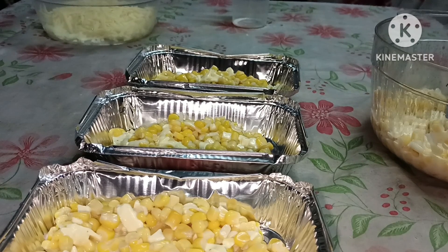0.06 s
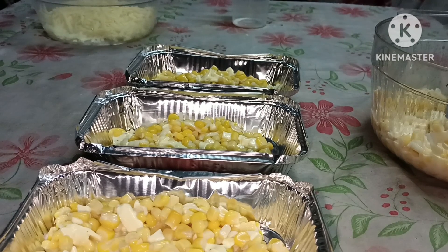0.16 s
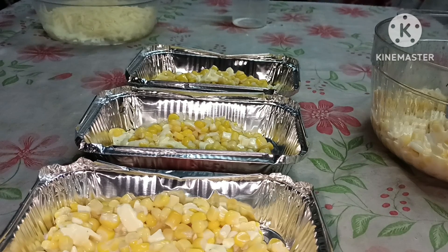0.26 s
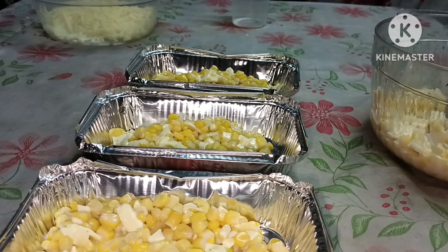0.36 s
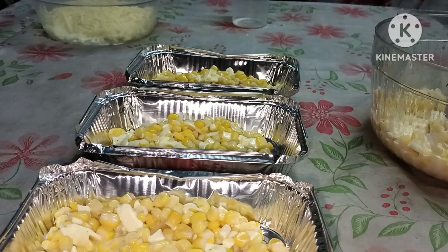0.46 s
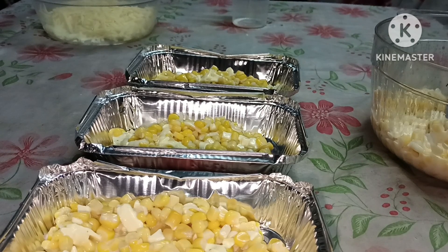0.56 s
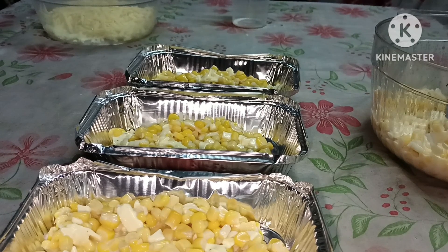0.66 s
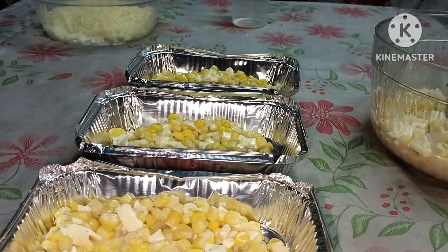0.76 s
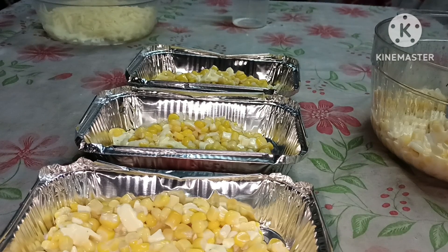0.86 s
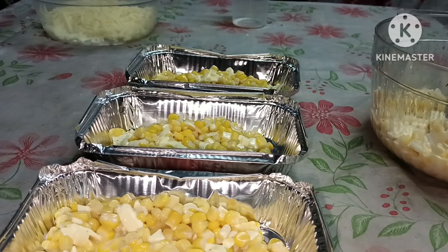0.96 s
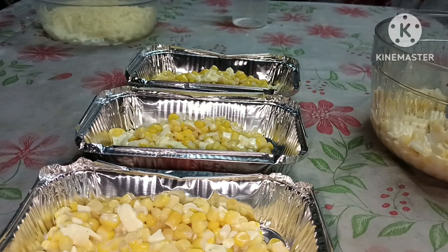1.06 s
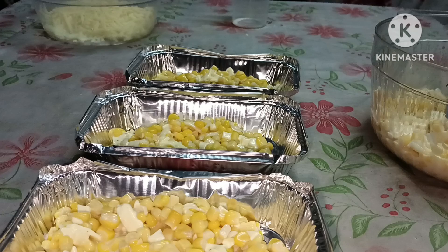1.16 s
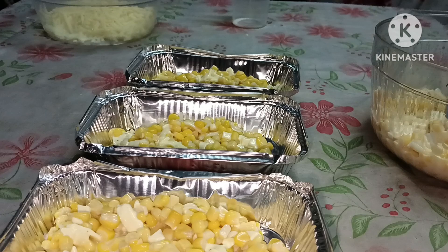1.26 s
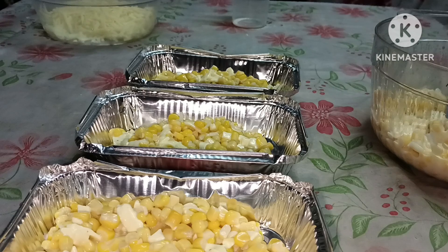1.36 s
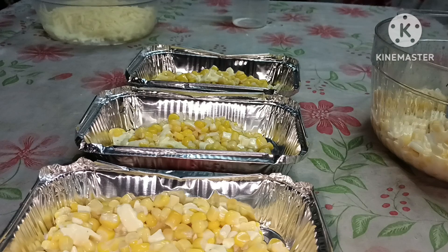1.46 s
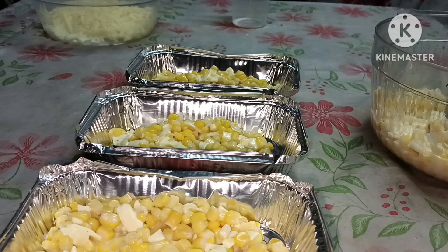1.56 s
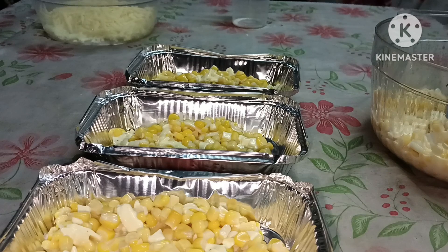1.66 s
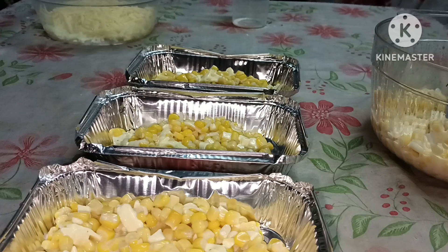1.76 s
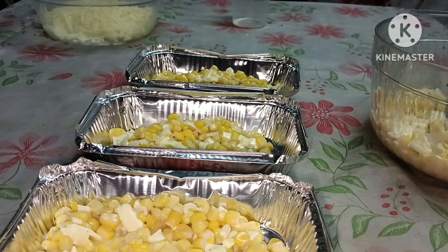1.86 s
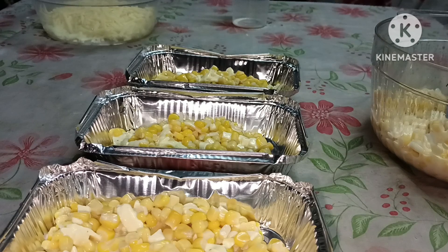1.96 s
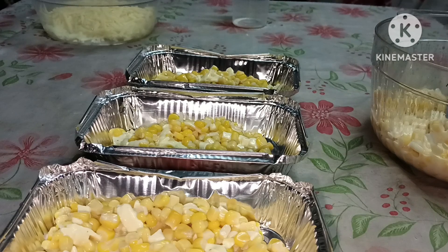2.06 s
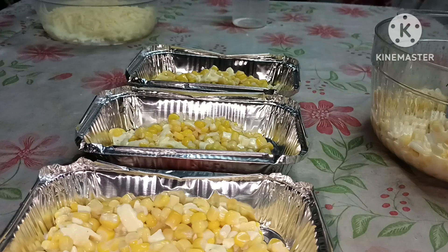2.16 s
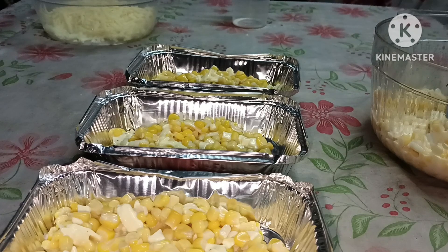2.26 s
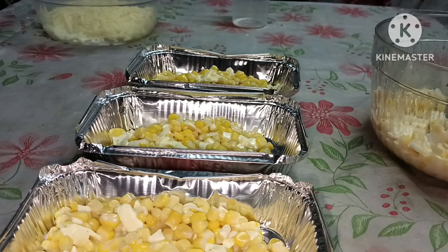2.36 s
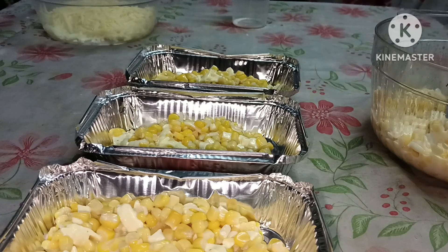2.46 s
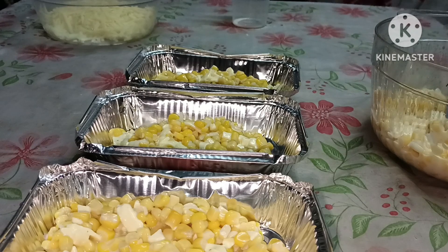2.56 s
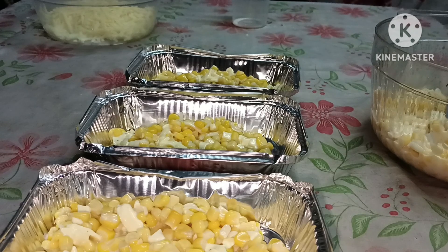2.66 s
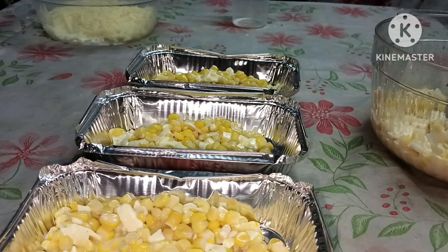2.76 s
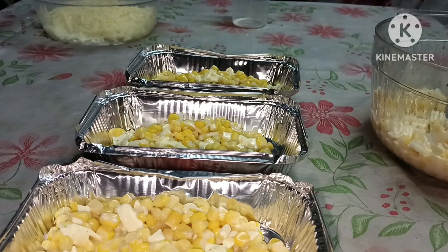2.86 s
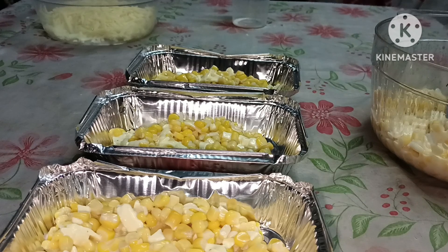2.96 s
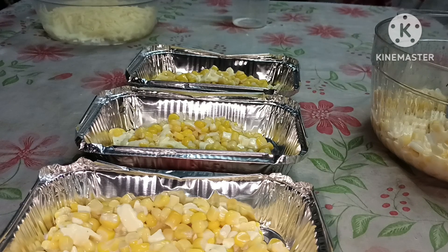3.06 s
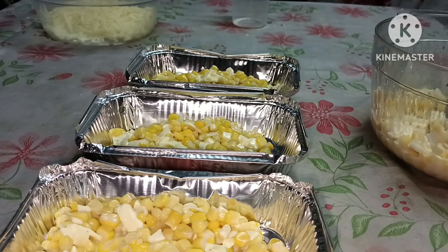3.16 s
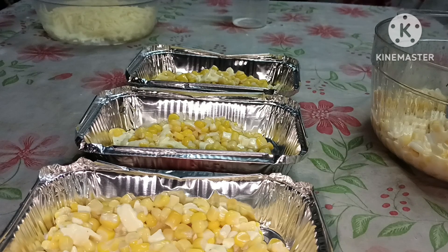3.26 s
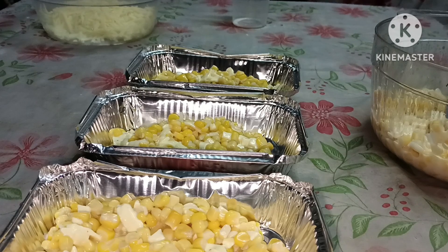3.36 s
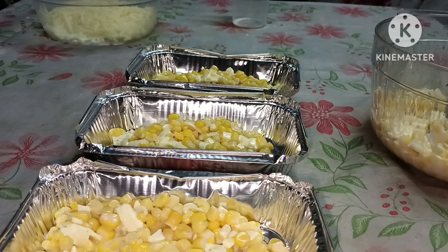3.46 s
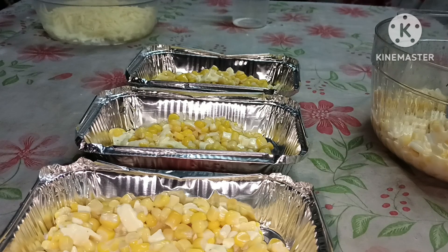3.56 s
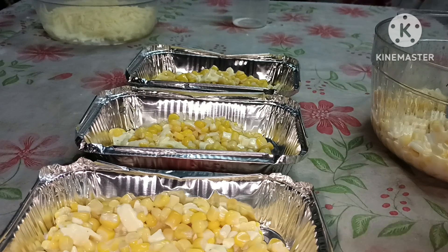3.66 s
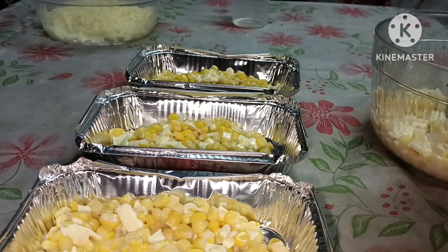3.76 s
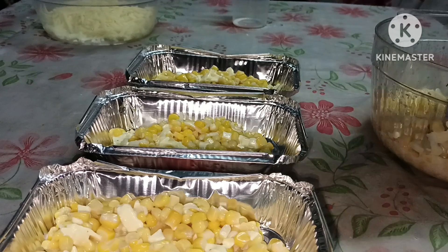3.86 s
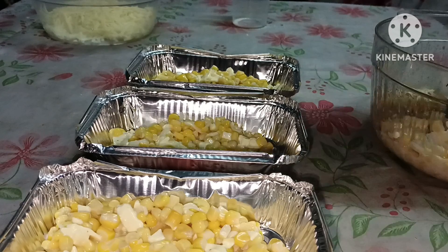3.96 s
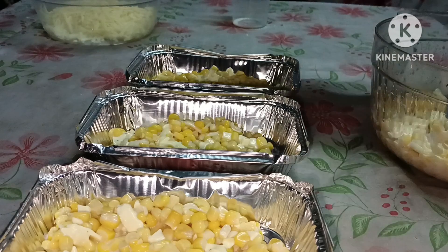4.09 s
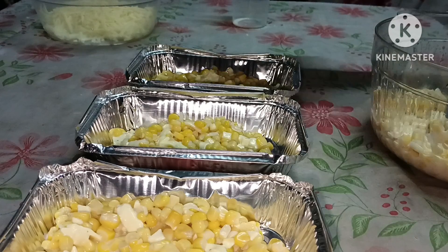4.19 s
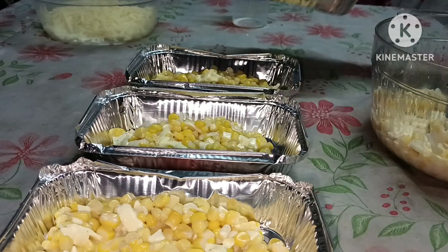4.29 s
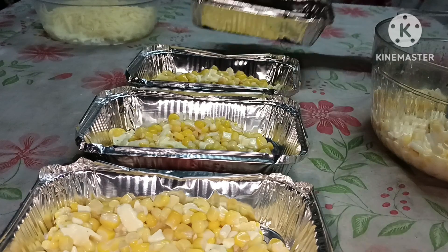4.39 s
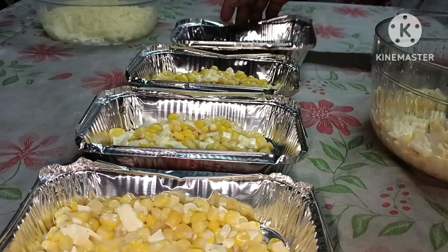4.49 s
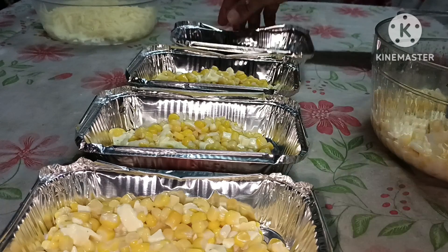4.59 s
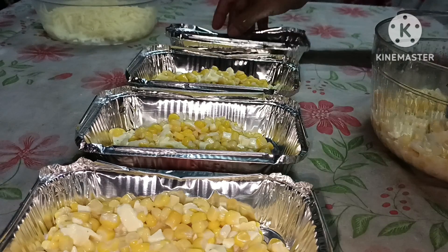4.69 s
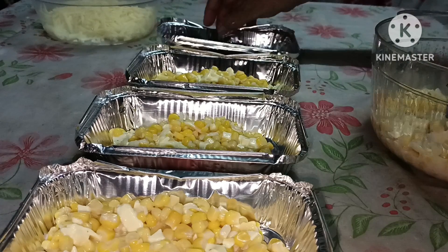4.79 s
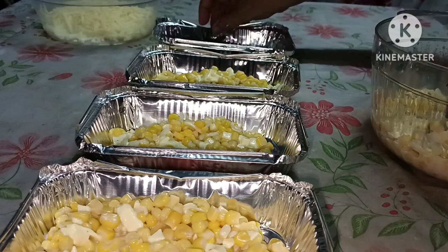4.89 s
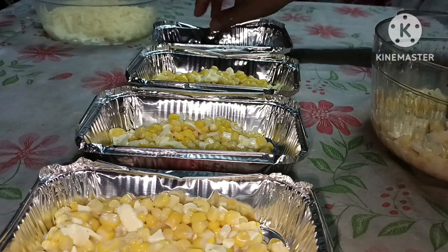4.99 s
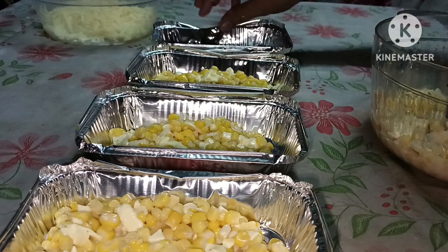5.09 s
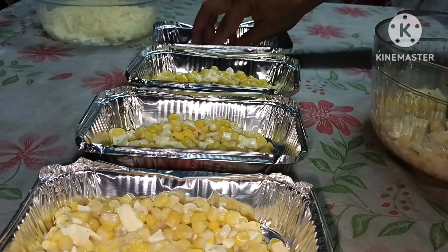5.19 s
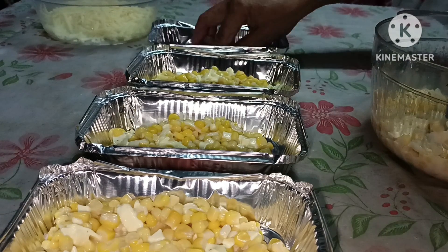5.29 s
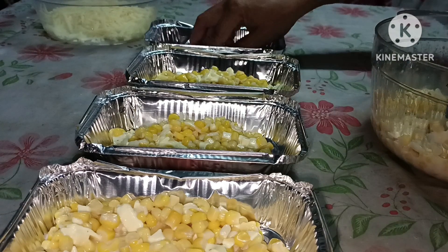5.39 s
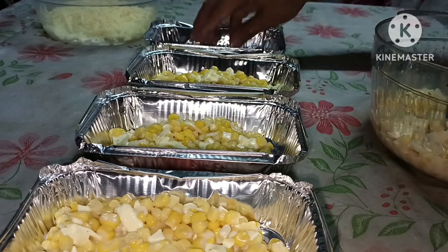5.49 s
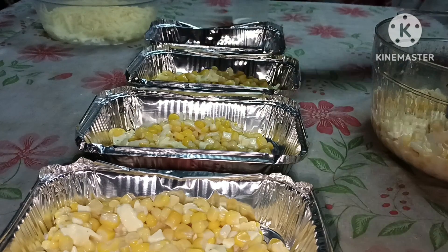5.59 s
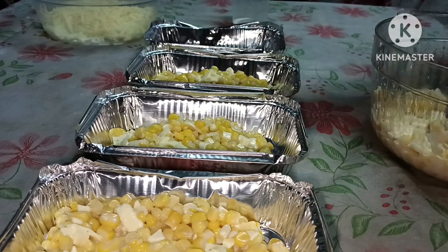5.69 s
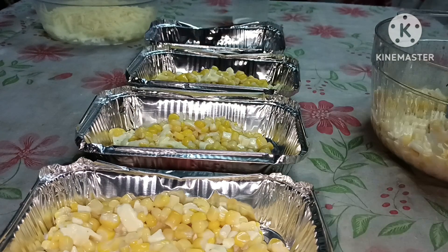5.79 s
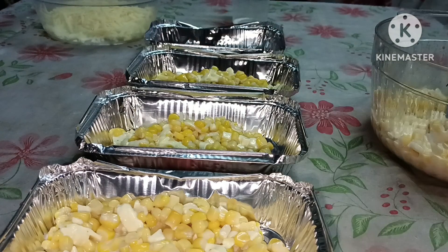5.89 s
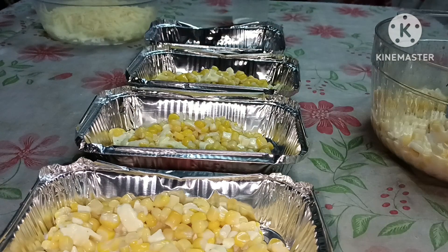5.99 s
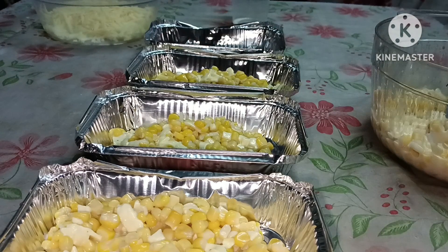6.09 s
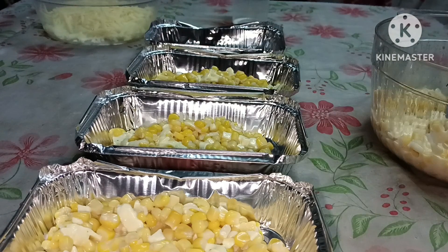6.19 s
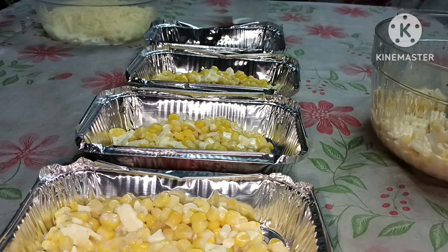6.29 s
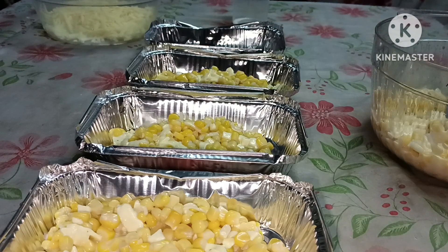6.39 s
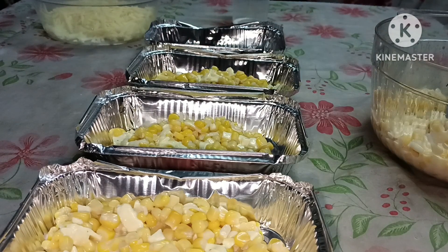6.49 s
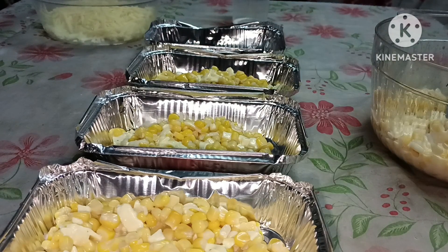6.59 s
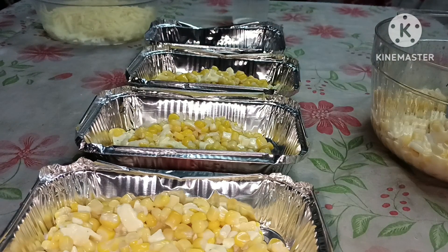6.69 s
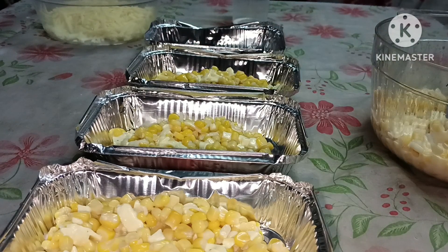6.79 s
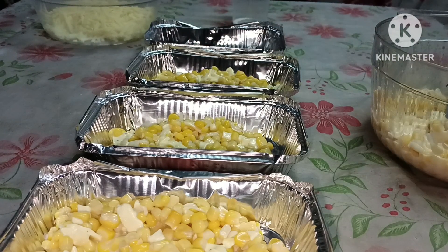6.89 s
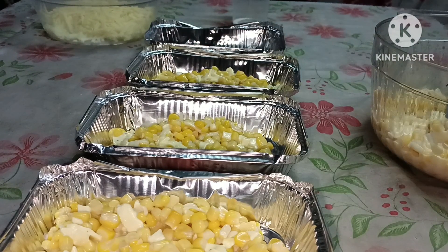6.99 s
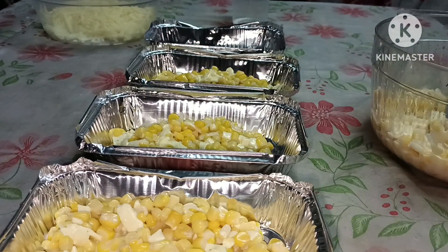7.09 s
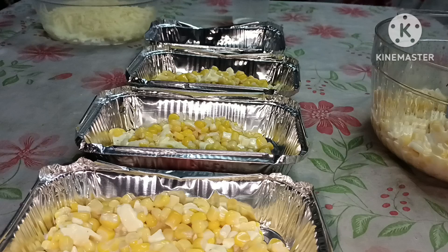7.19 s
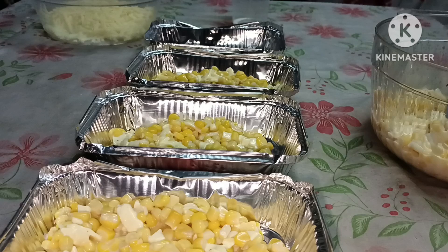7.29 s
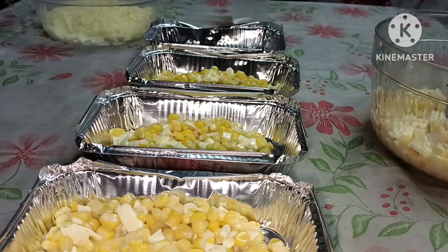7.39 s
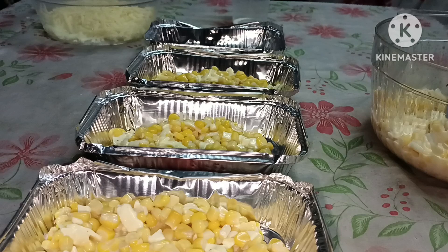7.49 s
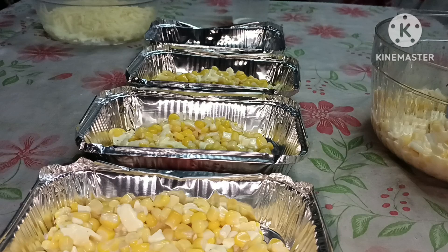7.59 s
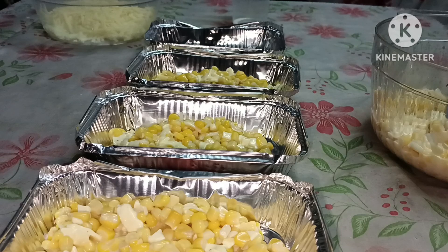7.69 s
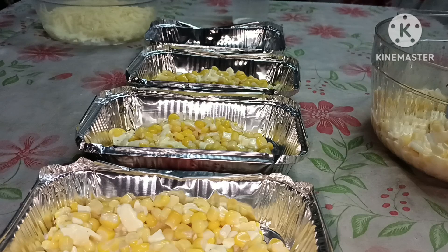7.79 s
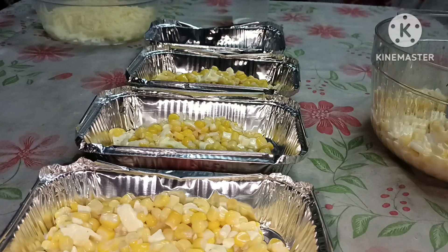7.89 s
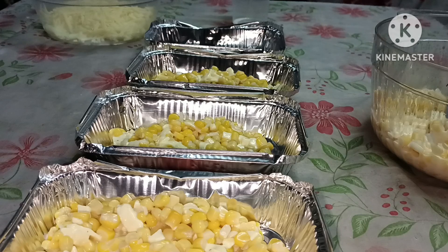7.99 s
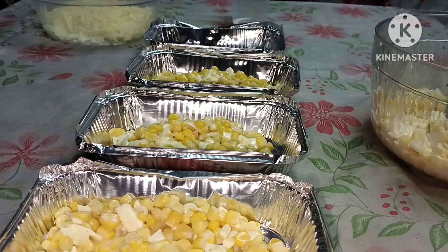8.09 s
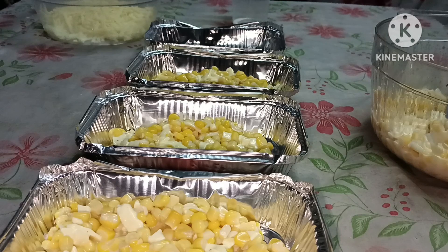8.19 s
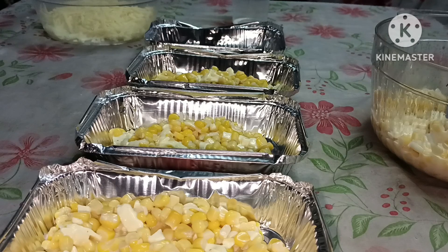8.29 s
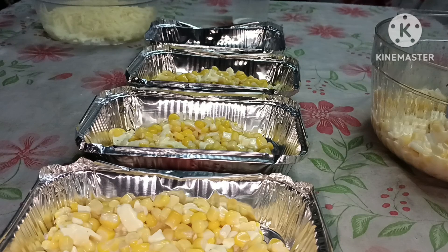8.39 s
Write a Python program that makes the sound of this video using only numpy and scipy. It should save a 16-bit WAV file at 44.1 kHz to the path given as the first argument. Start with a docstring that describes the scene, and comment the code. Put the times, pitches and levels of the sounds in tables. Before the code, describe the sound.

Close stereo microphone in a small quiet room. A few faint ticks of thin aluminium foil come first, then firmer clicks and a dense burst of bright crinkling and snapping as trays are handled and set on a covered table with dull little thuds. After a near pause, isolated snaps follow and a last crisp crinkle ends it. Low hum and soft hiss lie beneath.

```python
"""Creased foil trays snap and crinkle under handling: force pulses drive a crowd of short sheet modes.
Each snap adds a direct crack and a panel ring; contacts with a cloth-covered table excite its modes as thuds.
A small room adds decaying echoes. Two microphone ports differ in level, delay and treble.
Below lie mains hum (wandering sines), rumble and hiss (banded noise);
for about a second a faint, throbbing high squeal (a rough sine) comes from far off."""
import sys
import numpy as np
from scipy import signal
from scipy.io import wavfile
from scipy.ndimage import map_coordinates

SR = 44100
rng = np.random.default_rng(int(sys.argv[2]) if len(sys.argv) > 2 else 0)


def generate_wav(signal):
    """Clip the signal to [-1, 1] and save it as 16-bit WAV at the path in sys.argv[1]."""
    frames = np.transpose(np.atleast_2d(signal))
    scaled = np.clip(frames, -1, 1) * 32767
    pcm = np.round(scaled).astype(np.int16)
    wavfile.write(sys.argv[1], SR, pcm)


N = 372644

# snaps of the foil: [t/s, relative level/dB, body re level/dB, treble re level/dB, panel ring f/Hz]
SNAPS = [(0.049, -42.5, -16, 2.5, 930), (0.192, -36.5, -4.5, -4.5, 1190), (0.273, -31.5, -24, -17, 840),
         (0.328, -40.5, 6.5, -9, 1550), (0.464, -29, -25, -21, 735), (0.651, -27.5, -17, -9, 715),
         (0.728, -35.5, -17, -17, 1010), (0.832, -39, -13, -4, 820), (0.867, -32, -14, -0.5, 790),
         (0.93, -35.5, -3.5, -10, 670), (1.003, -45, -8, -2, 900), (1.147, -37, -19, -11, 850),
         (1.631, -24.5, -6, -27, 1804), (1.643, -15, -19, -20.5, 1060), (1.8, -32.5, -12.5, -14, 670),
         (1.877, -24, -26, -14.5, 690), (2.012, -35, -8, -20, 773), (2.063, -13.5, -11.5, -4, 1420),
         (2.496, -47.5, -4, 6, 710), (2.81, -28, -8, -4, 1740), (2.9, -32, -20, -16, 1180),
         (2.949, -35.5, -20, 8, 760), (2.962, -37.5, -21, 7.5, 960), (2.996, -37, -10, -23, 975),
         (3.018, -31, -11, -7, 1080), (3.029, -33, -8.5, 0, 990), (3.036, -30, -10, -2, 990),
         (3.047, -10.5, -26, -8, 1680), (3.064, -17, -16, -0.5, 1710), (3.087, -15, -16.5, -8, 970),
         (3.109, -27.5, -5.5, 2, 1030), (3.31, -27.5, -16, -2, 1010), (3.32, -36, -38, 3.5, 1000),
         (3.332, -16, -17, -5, 1640), (3.357, -22, -17.5, 3, 1420), (3.384, -20.5, -4, -2.5, 1590),
         (3.528, -28.5, -27.5, 5.5, 1540), (3.545, 3, -19, -8.5, 1385), (3.724, -14.5, -19.5, -18.5, 1635),
         (3.76, -31.5, 1.5, 8.5, 1040), (3.819, -2, -14.5, -7, 1324), (3.857, -14, -21, 1, 970),
         (4.051, -44, -13, 1, 1510), (4.13, -21, -7, -5, 1310), (4.28, -18, 5, -5.5, 1232),
         (4.66, -6.5, -15.5, -9, 1080), (4.664, -8.5, -18, -12, 1060), (4.685, 0, -19.5, -9, 758),
         (4.816, -32, -27, 8, 1270), (4.892, -28.5, -23, -3, 1170), (4.938, -9, -17, -41.5, 915),
         (4.945, -6.5, -24.5, -47.5, 1000), (5.016, -22.5, -10.5, -9.5, 1040), (5.044, -10, -23.5, -1, 960),
         (5.064, -4, -13, -6, 1400), (5.407, -8, -9, -4.5, 1065), (5.444, -10.5, -9.5, -23, 1280),
         (6.27, -27.5, -14, -17, 955), (6.287, -14.5, -14, -15.5, 890), (6.539, -32.5, -18, 5.5, 1600),
         (7.019, -37.5, -36, 11, 807), (7.025, -42, -35, 4.5, 803), (7.253, -30.5, -48, 8, 730),
         (7.276, -34, -35, 2, 789), (7.348, -0.5, -25.5, -7.5, 1947), (7.619, -27, -13, -58, 1074),
         (7.659, -14, -17.5, -44, 785), (7.685, -25, -0.5, -64, 1294), (7.823, -27, -14, -17.5, 965),
         (7.837, -6, -30, -11, 966), (8.133, -44, -18, -8, 1270), (8.142, -34, -17, -4, 1500),
         (8.151, -39, -21, -5, 1700), (8.241, -8, -24, 4, 1250), (8.252, -12.5, -2.5, -17, 1220),
         (8.336, -10.5, -12.5, -7.5, 990), (8.359, -20, -15, -2, 1000), (8.376, -30, -12, -3, 1010)]
BODY_HZ, MIDDLE_HZ, TREBLE_HZ = 960, 2845, 9300  # centres of the three force bands


def from_db(db):
    """Amplitude ratio of a level: 20 dB per factor of ten."""
    return 10 ** (np.asarray(db) / 20)


def rms_one(x):
    """Normalization of the mean square to 1."""
    return x / np.sqrt(np.mean(x ** 2) + 1e-20)


def in_time(rows):
    """Linear interpolation of each column of a time table, sample by sample."""
    times_s, *columns = np.transpose(rows)
    return [np.interp(np.arange(N) / SR, times_s, column) for column in columns]


def at_hz(points, hz):
    """Linear interpolation of a frequency table on a logarithmic frequency axis."""
    table_hz, values = np.array(points)[:, 0], np.array(points)[:, 1]
    return np.interp(np.log(hz), np.log(table_hz), values)


def drift(rate_hz):
    """Slow random modulation of rms 1: white noise through a double-pole low-pass."""
    # computed at every 40th sample, after a run-in of 2000 values
    pole = np.exp(-80 * np.pi * rate_hz / SR)
    white = rng.standard_normal(N // 40 + 2002)
    slow = signal.lfilter([1], [1, -2 * pole, pole * pole], white)[2000:]
    return np.interp(np.arange(N) / 40, np.arange(len(slow)), rms_one(slow))


def bandpass(edges_hz, x):
    """Band limitation by a Butterworth filter."""
    return signal.sosfilt(signal.butter(2, edges_hz, "band", fs=SR, output="sos"), x)


def ring(excitation, hz, t60_s):
    """Damped resonance: a unit click starts a decaying sine of initial height 1."""
    radius = from_db(-60 / (t60_s * SR))
    angle = 2 * np.pi * hz / SR
    poles = [1, -2 * radius * np.cos(angle), radius * radius]
    return signal.lfilter([0, np.sin(angle)], poles, excitation + 1e-18)


def snap_force(crack, rattle):
    """Impulsive excitation in three bands: a sharp crack with a weaker, slower-dying rattle."""
    band_db = [5, -10, 2]  # weights of body, middle and treble: [level/dB]
    crack_t60_s, crack_rise_s = 0.0052, 0.00061
    rattle_t60_s, rattle_db = 0.065, -19  # level before the weight "rattle"
    force = np.zeros((3, N))
    t = np.arange(int(rattle_t60_s * SR)) / SR
    shape = crack * from_db(-60 * t / crack_t60_s)
    shape = shape + rattle * from_db(rattle_db - 60 * t / rattle_t60_s)
    onset = 1 - np.exp(-t / crack_rise_s)
    for s, db, body_db, treble_db, _ in SNAPS:
        at = round(s * SR)
        levels = from_db(db + np.add(band_db, [body_db, 0, treble_db]))
        force[:, at:at + len(t)] += (onset * levels[:, None] * shape)[:, :N - at]
    return force


def crinkle_force(spread_db, per_s):
    """Random pulse process: many tiny uneven buckles, swelling and dying with each finger stroke."""
    # strokes: [peak t/s, rise t/s, fall t/s, relative peak level/dB, body re peak/dB, treble re peak/dB]
    strokes = [(0.282, 0.09, 0.18, -57, -18, 4.5), (1.21, 0.065, 0.098, -70, 7, 1),
               (1.585, 0.086, 0.17, -71, 3, 13), (1.78, 0.14, 0.072, -71, 5, 12),
               (2.068, 0.011, .12, -77, -9, -6), (3.06, 0.09, 0.058, -49, 0, -25),
               (3.369, 0.084, .2, -38.5, -5, -0.5), (3.448, 0.063, 0.17, -36.5, -4.5, 6),
               (3.55, 0.05, 0.1, -27, 0, 1), (3.679, 0.056, 0.023, -44, -11, 1.5),
               (3.734, 0.043, 0.11, -52, 8, 5), (3.828, 0.012, .12, -36, -1.5, -17),
               (3.908, 0.17, 0.16, -38, 10.5, -3.5), (4.07, 0.62, 0.068, -51.5, 2, 4),
               (4.285, 0.03, 0.071, -49.5, 2, -25), (4.491, 0.065, 0.19, -45.5, -15, 1.5),
               (4.667, 0.02, .26, -29.5, -6, -8), (5.082, 0.15, 0.15, -33.5, -16, -1.5),
               (5.411, 0.014, 0.11, -21, -7.5, -9), (5.47, 0.081, 0.19, -44.5, -27, -3.5),
               (6.33, .05, .3, -68, -17, 8), (6.52, 0.088, 0.24, -53.5, -39, 4.5),
               (7.354, 0.028, 0.16, -42, -11, 5.5), (7.839, 0.065, 0.17, -55, -9, 7),
               (7.92, 0.1, 0.11, -61.5, -15, 4.5), (8.14, 0.19, 0.39, -44, 2, 3),
               (8.245, 0.095, 0.14, -29.5, -2, 6.5), (8.347, 0.066, 0.13, -36, 4.5, -12)]
    swell_db = 30  # rise, and equal fall, of a stroke
    force = np.zeros((3, N))
    for s, rise_s, fall_s, db, body_db, treble_db in strokes:
        start, stop = max(round((s - rise_s) * SR), 0), min(round((s + fall_s) * SR), N)
        n = np.arange(start, stop)
        course_db = np.interp(n / SR, [s - rise_s, s, s + fall_s], [-swell_db, 0, -swell_db])
        force[:, n] += from_db(db + course_db + np.array([[body_db], [0], [treble_db]]))
    sizes = from_db(spread_db * np.minimum(rng.exponential(1, N), 2.6))
    buckles = (rng.random(N) < per_s / SR) * sizes
    # each buckle dies within a few milliseconds, over a steady floor
    return force * rms_one(signal.lfilter([1], [1, -.97], buckles) + .5)


def foil(force, cycles, bend_db, apart_db):
    """Modal superposition: a dense crowd of short sheet modes; bending sways each, unlike at the ports."""
    colour = [(480, -4), (750, -2.5), (1100, 9), (1500, 5), (2100, 10), (3000, 3), (4200, 2), (6000, -8),
              (7300, -15.5), (8000, -6), (9800, 0.5), (12500, -13.5), (15200, -1), (15900, -21.5)]  # radiated spectrum of the sheet: [f/Hz, relative level per Hz/dB]
    low_hz = 590  # the small sheet radiates no bass
    n, out = np.arange(float(N)), np.zeros((2, N))
    centres = np.log([BODY_HZ, MIDDLE_HZ, TREBLE_HZ])
    white, log_force = rng.standard_normal(N), np.log(force + 1e-9)
    bends = np.arange(0, N + 1500, 1500)  # samples at which the sway takes a new value
    modes_hz = np.geomspace(500, 15800, 60) * rng.uniform(0.8295, 1.115, 60)
    for k, hz in enumerate(modes_hz):
        # the force at this mode lies between those of the neighbouring bands
        place = np.interp(np.log(hz), centres, [0, 1, 2])
        below = min(int(place), 1)
        share = place - below
        strength = np.exp((1 - share) * log_force[below] + share * log_force[below + 1])
        colour_db = at_hz(colour, hz) - at_hz(colour, MIDDLE_HZ)
        # higher modes stand for wider slices of the spectrum and ring shorter
        ringing = ring(strength * np.roll(white, 997 * k), hz, cycles / hz)
        mode = from_db(colour_db) * hz / SR * ringing
        shared, apart = rng.standard_normal((2, len(bends)))
        for port, sign in enumerate([1, -1]):
            sway_db = bend_db * shared + sign * apart_db * apart
            out[port] += mode * np.interp(n, bends, from_db(sway_db))
    return signal.sosfilt(signal.butter(4, low_hz, "high", fs=SR, output="sos"), out)


def cracks():
    """Direct radiation: the first instant of each snap is a noise burst, too short to ring."""
    bands_hz = [(600, 1500), (1500, 2300), (7600, 19000)]  # body, middle and treble: [low f/Hz, high f/Hz]
    bursts = snap_force(crack=1, rattle=0) * rng.standard_normal(N) + 1e-18
    return from_db(-8) * sum(bandpass(band, burst) for band, burst in zip(bands_hz, bursts))


def panel_rings():
    """Free vibration: the flat panel next to each snap rings briefly on a close pair of modes."""
    ring_db, t60_s = -3.2, 0.067
    out, t = np.zeros(N), np.arange(int(t60_s * SR)) / SR
    splits = rng.uniform(1.04, 1.12, len(SNAPS))  # frequency ratio of each pair
    for (s, db, body_db, _, hz), split in zip(SNAPS, splits):
        pair = np.sin(2 * np.pi * hz * t) + 0.42 * np.sin(2 * np.pi * hz * split * t)
        decay = from_db(db + body_db + ring_db - 60 * t / t60_s)
        at = round(s * SR)
        out[at:at + len(t)] += (decay * pair)[:N - at]
    return out


def table_thuds():
    """Impulse response of the table top: each contact sets its damped low modes ringing."""
    contacts = [(0.925, -44), (2.012, -34), (2.813, -35), (3.546, -25), (3.82, -19.5), (3.853, -17),
                (3.897, -23.5), (4.278, -24.5), (4.66, -23), (4.684, -41), (5.065, -38), (5.405, -30),
                (5.444, -29), (6.27, -25.5), (6.29, -45), (6.487, -34), (8.23, -32.5)]  # contacts that shake the table: [t/s, relative level/dB]
    modes = [(130, 7.5, 0.017), (177, 9, 0.065), (240, 1.5, 0.053), (291.3, 3, 0.095), (385, -11.5, 0.13),
             (474.4, -8.5, 0.013)]  # modes of the table top: [f/Hz, relative level/dB, t60/s]
    at, out = [round(s * SR) for s, _ in contacts], np.zeros(N)
    contact_db = np.array(contacts)[:, 1]
    scatter_db = rng.normal(0, 4.18, (len(at), len(modes)))
    for k, (hz, mode_db, t60_s) in enumerate(modes):
        clicks = np.zeros(N)
        # neighbouring modes start with opposite signs
        clicks[at] = from_db(contact_db + mode_db - 10.0 + scatter_db[:, k]) * (-1) ** k
        out += ring(clicks, hz, t60_s)
    return out


def ports(x):
    """Interport level and time difference: the sound is louder and earlier at the nearer port."""
    lean = [(0, 3.5), (3.4, 3), (4.12, 8.5), (4.4, 2.5), (5.5, 2), (6.2, 5), (8.45, 4)]  # where the hands work: [t/s, left-right level difference/dB]
    lag_per_db = 4  # samples by which the right port hears later, per dB of lean
    # the left port faces the left side: its top treble grows with the lean
    top_hz, top_db, top_db_per_db = 11900, -4, 1.03
    lean_db, = in_time(lean)
    lag, n = np.clip(lag_per_db * lean_db, -17, 17), np.arange(N)
    low = signal.sosfilt(signal.butter(2, top_hz, "low", fs=SR, output="sos"), x)
    top = signal.sosfilt(signal.butter(2, top_hz, "high", fs=SR, output="sos"), x)
    # the minus sign keeps the two parts in phase where they cross
    left, right = low - top * from_db(top_db + top_db_per_db * lean_db * [[1], [0]])
    delayed = map_coordinates(right, [n - lag], order=3)
    return np.array([from_db(lean_db / 2) * left, from_db(-lean_db / 2) * delayed])


def room(near):
    """Reverberation: dense echoes, other ones at each port, as octave bands of noise with own decays."""
    decay = [(300, 0.41), (1500, 0.21), (4000, 0.29), (12000, .16)]  # reverberation time of the room: [f/Hz, t60/s]
    first_echo_s = 0.004
    t, tail = np.arange(SR // 2) / SR, 0
    for hz in 125 * 2. ** np.arange(8):
        edges = [hz / np.sqrt(2), min(hz * np.sqrt(2), .45 * SR)]
        band = bandpass(edges, rng.standard_normal((2, len(t))))
        tail = tail + band * from_db(-60 * t / at_hz(decay, hz))
    tail = tail * (1 - np.exp(-(t / first_echo_s) ** 2))  # echoes set in gradually
    return signal.fftconvolve(near, rms_one(tail) / np.sqrt(len(t)), axes=1)[:, :N]


def wavering_tone(hz, db, waver_hz, flicker_db):
    """Frequency and amplitude modulation: a sine whose pitch and level wander."""
    phase = 2 * np.pi * np.cumsum(hz + waver_hz * drift(8)) / SR
    return np.sqrt(2) * from_db(db + flicker_db * drift(4.6)) * np.sin(phase)


def squeal():
    """Modulated tone: a faint, rough whistle sags in pitch, settles and throbs, unlike in the two ports."""
    start_s, end_s, fade_s = 1.27, 2.55, .06
    start_hz, sag_hz, sag_s = 8730, 260, .3
    mean_db, pulse_db, pulse_s = -73, 3, .16  # throb about the mean level, and its period
    t = np.arange(N) / SR - start_s
    hz = start_hz - sag_hz * (1 - np.exp(-np.maximum(t, 0) / sag_s))
    sounding = np.clip(np.minimum(t, end_s - start_s - t) / fade_s, 0, 1)
    throb_db = mean_db + pulse_db * np.cos(2 * np.pi * (t - .05) / pulse_s)
    heard = []
    for port in range(2):
        rough_hz, rough_db = hz + 70 * drift(147), throb_db + 4 * drift(24)
        heard.append(sounding * wavering_tone(rough_hz, rough_db, waver_hz=20.0, flicker_db=0.91))
    return np.array(heard)


def banded_noise(spectrum, low_hz, count, patchy_db):
    """Partly coherent noise: half-octave bands with own level, flicker and port correlation; rms 1."""
    likeness = [(30, 0.84), (120, 1), (250, 0.58), (500, -0.84), (1500, -0.27), (12000, 0.024)]  # correlation of the two ports: [f/Hz, coefficient]
    out, edges = 0, low_hz * 2 ** (np.arange(count + 1) / 2)
    white = rng.standard_normal((2, 2, N))
    for k, (low, high) in enumerate(zip(edges, edges[1:])):
        mid, side = bandpass([low, high], white[k % 2])
        hz = np.sqrt(low * high)
        alike = np.clip(at_hz(likeness, hz), -1, 1)
        gain = from_db(at_hz(spectrum, hz) + patchy_db * drift(3.2))
        out = out + gain * (np.sqrt(1 + alike) * mid + np.sqrt(1 - alike) * side * [[1], [-1]])
    return rms_one(out)


def background():
    """Stationary sources: rumble, mains hum with fainter tones, and the hiss of room and microphone."""
    # slow courses: [t/s, relative rumble level/dB, relative hum level/dB, relative second partial level/dB]
    courses = [(0.0, -52.5, -47.5, -58), (1.13, -51, -49, -90.5), (1.41, -50.5, -46.5, -48.5),
               (7.58, -56, -50.5, -61.5), (8.45, -54.5, -51, -56.5)]
    faint_tones = [(49, -62.5), (144, -57), (243, -61.5), (301, -67.5)]  # fainter tones: [f/Hz, relative level/dB]
    rumble_spectrum = [(12, -47), (20, -8.5), (49, -3.5), (70, 1), (81, -10), (102, -8.5), (242, -5.5),
                       (269, -18.5), (500, -29), (650, -63), (1100, -120)]  # [f/Hz, relative level per Hz/dB]
    hiss_spectrum = [(180, -31), (300, -1), (470, -20.5), (645, -18), (701, -9), (1210, -16.5),
                     (1610, -21.5), (2980, -23), (6740, -41.5), (9710, -29), (11300, -38.5), (14700, -36),
                     (16000, -45)]  # [f/Hz, relative level/dB]
    hum_hz = 100.3
    rumble_db, hum_db, second_db = in_time(courses)
    rumble = from_db(rumble_db + 6.5) * banded_noise(rumble_spectrum, 23.43, count=9, patchy_db=0.5)
    hiss = from_db(-58.5) * banded_noise(hiss_spectrum, 342.6, count=11, patchy_db=0.13)
    hum = wavering_tone(hum_hz, hum_db, waver_hz=2.42, flicker_db=2.55)
    hum = hum + wavering_tone(2 * hum_hz, second_db, waver_hz=3.4, flicker_db=3.4)
    hum = hum + sum(wavering_tone(hz, db, waver_hz=1.5, flicker_db=1.7) for hz, db in faint_tones)
    return rumble + hiss + hum * from_db([[.6], [-.6]])  # the hum is slightly stronger on the left


def scene():
    """Linear superposition of trays, table, room, background and squeal."""
    shaking = from_db(5.0) * snap_force(crack=0.6, rattle=0.52)
    shaking = shaking + crinkle_force(spread_db=3.5, per_s=600.0)
    # 30 cycles: length of a mode's decay by 60 dB
    trays = foil(shaking, cycles=30, bend_db=2, apart_db=4.5) + cracks()
    near = ports(trays + panel_rings() + table_thuds())
    echoes = from_db(-13) * room(near)
    return near + echoes + background() + squeal()


def record(dry):
    """Saturation and band limitation: the loudest peaks are rounded, the top is cut."""
    full_scale, cutoff_hz = .97, 16500
    rounded = full_scale * np.tanh(dry / full_scale)
    return signal.sosfilt(signal.cheby2(12, 60, cutoff_hz, fs=SR, output="sos"), rounded)


dry = scene()
out = record(dry)
generate_wav(out)
```